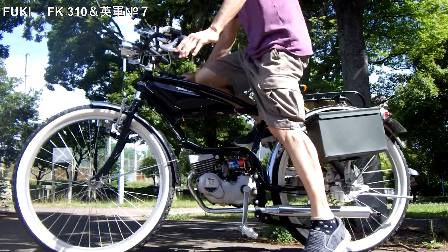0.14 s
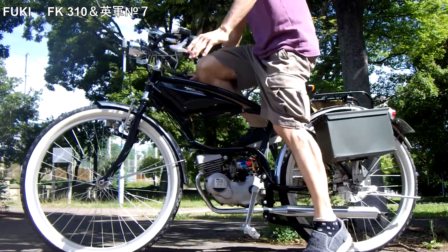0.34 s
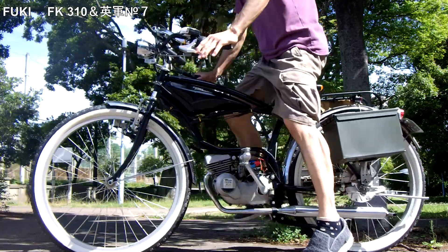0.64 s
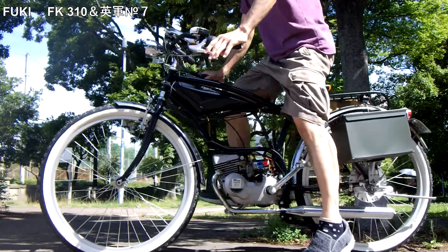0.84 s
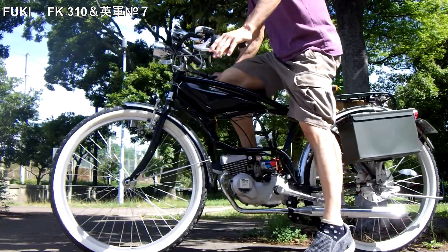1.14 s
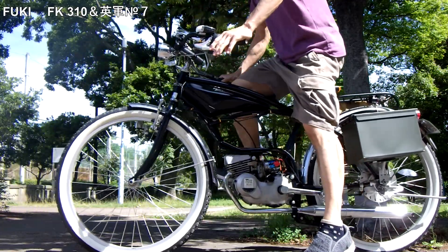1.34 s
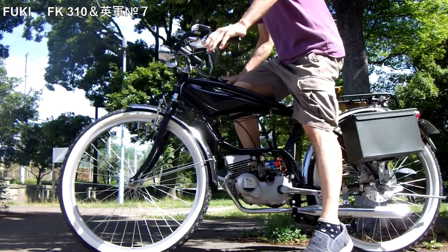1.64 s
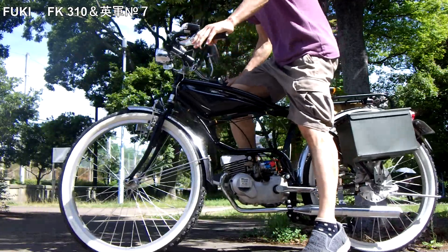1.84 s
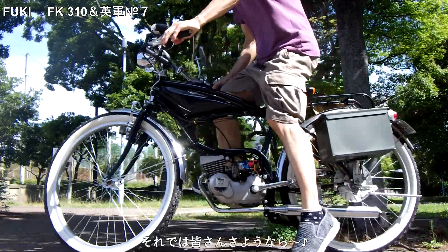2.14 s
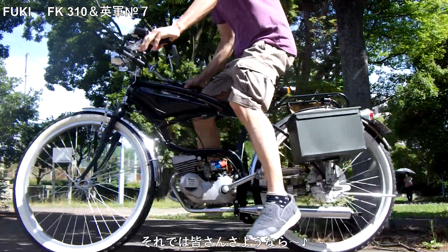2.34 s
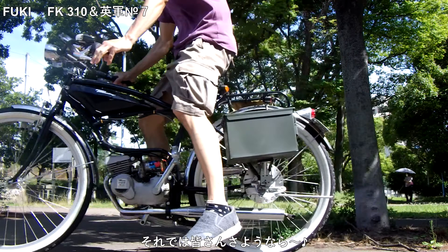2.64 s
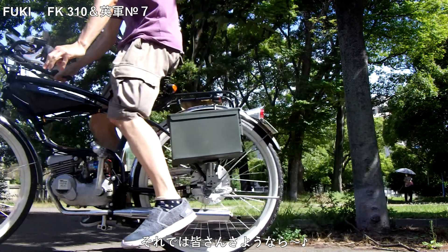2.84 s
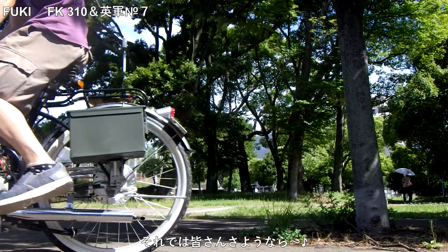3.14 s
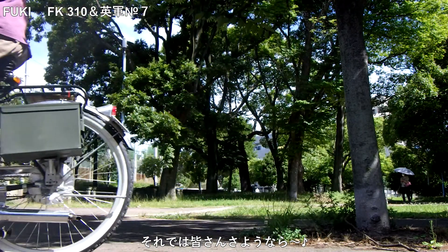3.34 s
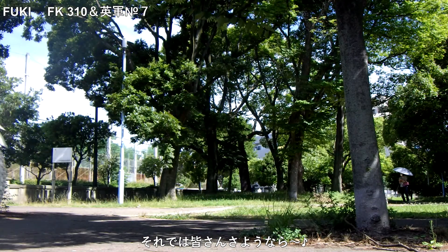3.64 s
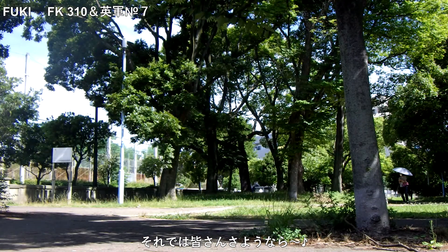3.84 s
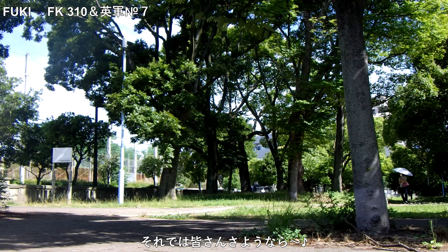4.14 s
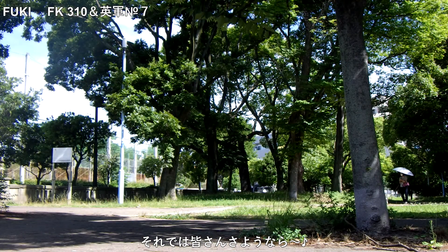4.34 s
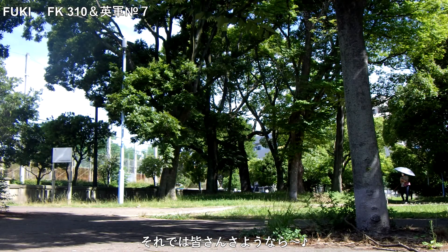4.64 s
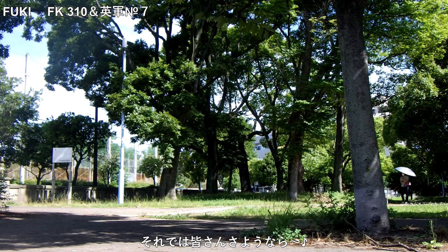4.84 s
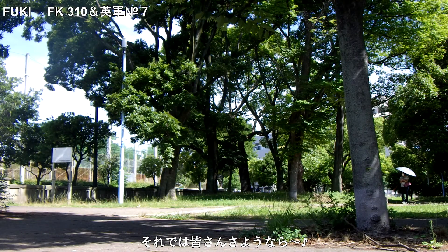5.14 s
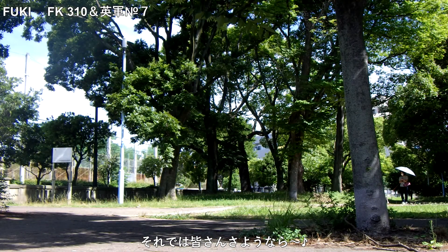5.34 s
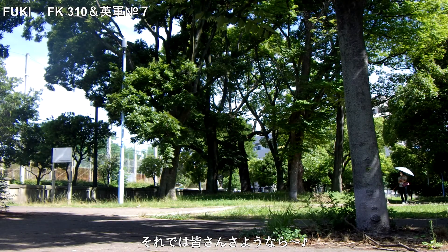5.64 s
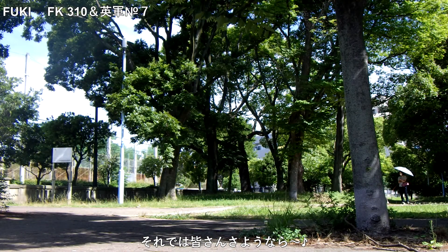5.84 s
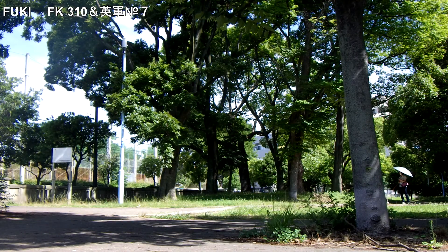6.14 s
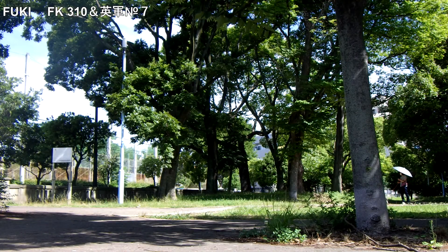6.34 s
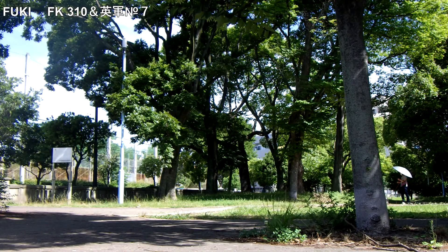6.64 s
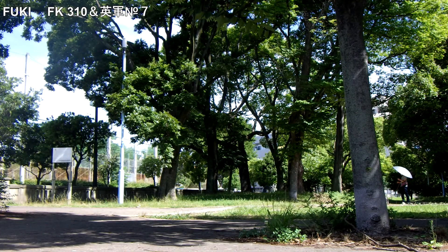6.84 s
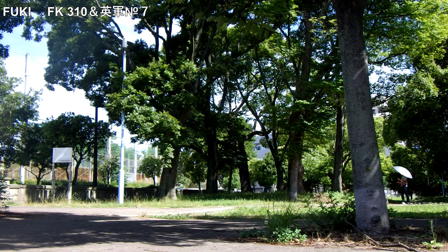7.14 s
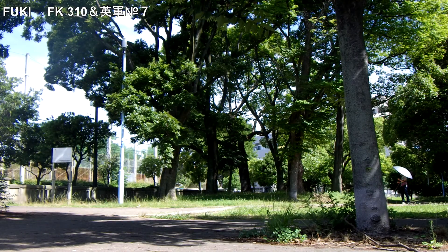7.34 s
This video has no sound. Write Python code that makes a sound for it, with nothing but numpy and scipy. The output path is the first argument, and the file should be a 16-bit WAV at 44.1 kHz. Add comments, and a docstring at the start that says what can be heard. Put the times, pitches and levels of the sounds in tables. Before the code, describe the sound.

In a quiet park, a motorised bicycle's small single-cylinder engine idles close to the microphone, its slack drive clattering against a metal cover. The throttle blips twice, with a few bright ticks. After about two seconds the clutch scrapes, the clatter stops and the engine settles into a louder, firm putter. Its pitch creeps up as the bike rides off over a soft rush of tyres and chain, easing at the end.

```python
"""A small single-cylinder engine rumbles at idle in a park, its slack drive clattering in bursts.
After two blips the throttle opens, the load stills the clatter, and the motorised bicycle putters off,
tailpipe towards the listener, then coasts. Each source is an excitation shaped by a resonator: once a
cycle a pressure pulse drives the muffler, the piston knocks the crankcase, valves ring the head and gas
hisses out. The beats echo outdoors, over a rush of tyres and chain that grows as the bike gathers speed."""
import sys
import numpy as np
from scipy import signal
from scipy.fft import rfft, irfft, next_fast_len
from scipy.io import wavfile
from scipy.ndimage import uniform_filter1d

SR = 44100
rng = np.random.default_rng(int(sys.argv[2]) if len(sys.argv) > 2 else 0)


def dump_mix(stems):
    """Bounce the given channels to the path in sys.argv[1] as a 16-bit WAV at rate SR."""
    frames = np.atleast_2d(stems).T  # one column per channel
    limited = np.clip(frames, -1, 1)  # hard clip at full scale
    pcm = np.round(limited * 32767).astype(np.int16)
    wavfile.write(sys.argv[1], SR, pcm)


N = 331191
T = np.arange(N) / SR

# engine speed: (time [s], firing rate [Hz])
FIRING_RATE = [(0.0, 45.49), (0.25, 45.93), (0.7, 43.98), (1.05, 43.18), (1.35, 42.85), (1.75, 42.17),
               (2.25, 48.1), (2.65, 48.89), (3.8, 50.16), (4.4, 50.59), (4.8, 51.78), (5.2, 52.13),
               (5.95, 52.64), (6.2, 53.76), (6.42, 52.78), (6.85, 53.76), (7.27, 53.67), (7.51, 48.32)]
# throttle twists, a blip, a creep, a second blip and the ride: (opens [s], closes [s], load [0-1])
THROTTLE_TWISTS = [(.1, .255, .5), (.86, 1.85, .1), (1.81, 1.97, .62), (1.95, 2.16, .25), (2.11, 7.255, 1)]
# responses of muffler, intake, rearward bark, pipe boom and idle rumble: (frequency [Hz], gain [dB])
MUFFLER_RESPONSE = [(30, -43), (52, -28.5), (100, -18.5), (160, -17.5), (210, -19), (260, -22.5),
                    (300, -12.5), (350, -7.5), (400, -11), (460, -3), (560, 1.5), (680, 2.5), (790, -2),
                    (850, -7.5), (920, -24), (1000, -15), (1090, -23.5), (1170, -20), (1400, -43),
                    (2500, -82)]
INTAKE_RESPONSE = [(50, -37), (110, -21), (250, -16), (330, -4), (420, 5), (580, -3.5), (760, 7.5),
                   (860, -1.5), (960, -18.5), (1300, -30), (2500, -66)]
BARK_RESPONSE = [(500, -35), (720, -21), (805, 0), (855, -30), (915, -17.5), (965, -18), (1020, -28),
                 (1080, -49), (2500, -72)]
BOOM_RESPONSE = [(420, -50.5), (520, -13), (570, -6.5), (620, -10.5), (700, -39), (2500, -75.5)]
IDLE_RESPONSE = [(30, -24), (85, -16.5), (170, -20.5), (230, -13), (320, -13.5), (400, -6), (480, -2.5),
                 (570, 4.5), (680, -4), (850, -1.5), (950, -14.5), (1300, -16.5), (2000, -17.5)]
# resonances of exhaust pipe, crankcase, gears and a lower buzz: (frequency [Hz], width [Hz], gain [dB])
PIPE_MODES = [(562, 23, -5.5), (674, 25, -14.5), (849, 17, -2.5)]
CASE_MODES = [(1480, 780, 4), (2015, 70, 13), (2113, 64, 15.5)]
GEAR_MODES = [(1735, 20, 0), (1766, 15, -12)]
BUZZ_MODES = [(1253, 46, 0)]
# swells and dips of the gears' ring: (time [s], width [s], gain [dB])
GEAR_SWELLS = [(2.85, 0.14, 1.5), (4.04, 0.14, -6), (4.5, 0.55, 1), (5.85, 0.074, 4), (6.3, 0.088, 5),
               (6.7, 0.08, 3.5)]
# resonances of cylinder head, valve rasp, drive cover and clutch: (frequency [Hz], width [Hz], gain [dB])
HEAD_MODES = [(2626, 20, 8), (2765, 270, 4.5), (4150, 660, -2), (4427, 48, 10), (4550, 98, -1),
              (6300, 140, -7), (8200, 3600, -9)]
RASP_MODES = [(2910, 250, 0)]
COVER_MODES = [(840, 1300, -22), (1360, 570, -13.5), (1671, 31, 8), (1866, 82, 1.5), (2430, 330, -13)]
CLUTCH_MODES = [(1325, 210, 11), (2680, 170, 9.5)]
# moments when the valves rasp out: (time [s], width [s], level [dB])
RASP_SWELLS = [(.65, 0.44, -40.5), (3.1, 0.31, -51), (3.9, 0.32, -48.5), (6.4, 0.41, -48.5)]
# spectra of a seating valve's crack, the gas jet's hiss and its airy top: (frequency [Hz], gain [dB])
CRACK_SPECTRUM = [(3000, -31), (6300, 17), (8000, -36), (11000, 15), (13000, 5), (15000, 10)]
HISS_SPECTRUM = [(2000, -27), (5400, -8), (6500, 23), (7600, -18), (8500, 1), (10600, 18), (12000, 8.5),
                 (14000, -2)]
AIR_SPECTRUM = [(8000, -29), (11000, -0.5), (12600, -2), (14400, 5), (17000, 5)]
# blows of the slack drive on its cover: (time [s], relative level [dB])
CLATTER_BURSTS = [(0.002, -28.5), (0.064, -28), (0.156, -27), (0.205, -26.5), (0.245, -25), (0.309, -32),
                  (0.372, -29), (0.439, -30.5), (0.484, -28), (0.559, -26), (0.641, -27.5), (0.711, -27),
                  (0.798, -28), (0.894, -25), (0.988, -22.5), (1.034, -29), (1.103, -23.5), (1.15, -23.5),
                  (1.219, -22), (1.309, -27), (1.379, -35), (1.43, -33), (1.502, -23.5), (1.574, -21),
                  (1.645, -20.5), (1.719, -33), (1.853, -25), (1.901, -23), (1.942, -19), (1.987, -26),
                  (2.031, -31.5), (2.074, -26.5)]
# metal ticks as the rider sets off: (time [s], level [dB])
METAL_TICKS = [(1.85, -22.5), (1.891, -23), (1.981, -25), (2.47, -31)]
# spectrum of those ticks: (frequency [Hz], gain [dB])
TICK_SPECTRUM = [(3000, 4.5), (7000, -14), (11000, -4.5), (15000, -18), (18000, -10)]
# path of the nearest echo: (time [s], delay [s], strength [0-1])
ECHO_PATH = [(4.2, .0124, 0), (4.7, .0105, .45), (5.05, .009, .3), (5.3, .0082, .85), (5.65, .00735, .9),
             (6.05, .00715, .05), (6.25, .00712, .7), (7.0, .00705, 1)]
# its reflector, too narrow to return the lows: (frequency [Hz], gain [dB])
REFLECTOR_RESPONSE = [(250, -37), (400, -2.5), (560, 0), (800, 7.5)]
# spectra of tyres and chain, and of the park: (frequency [Hz], gain [dB])
ROLLING_SPECTRUM = [(30, -7), (70, 1), (150, -1), (220, 3), (330, 7), (600, 13), (1100, 4), (1600, -9.5),
                    (2100, 4), (2800, -32), (6000, -42), (14000, -28)]
PARK_SPECTRUM = [(30, -9), (55, -4), (85, -2.5), (150, -3), (220, -2), (320, 2.5), (600, 9.5), (1100, 2.5),
                 (1600, 2), (2100, -5), (2800, -8), (6000, -22.5), (14000, -34)]
# narrow dips cut by the recorder's notch filters: (frequency [Hz], width [Hz], gain [dB])
NOTCH_DIPS = [(3230, 170, -15), (4100, 50, -9), (5220, 200, -16), (5720, 190, -24), (7130, 90, -14),
              (8450, 350, -8)]

# stages of the ride: (start [s], end [s])
CLUTCH_BITES, GATHERS_SPEED, RECEDES = (1.56, 2.46), (2.6, 5.3), (5.5, 6.2)
ENGINE_HIDDEN, CASE_HIDDEN = (2.97, 5.24), (3.5, 4.1)  # rider and luggage shield the engine
PIPE_CLEARS, BOOM_OPENS = (3.4, 5.14), (3.78, 3.96)  # the rear wheel stops shielding the pipe
TAILPIPE_TURNS, HISS_FADES, RUSH_SWELLS = (3.6, 4.65), (4.7, 5.5), (7, 7.85)


def exhaust(cycle, load, idle_db=-30, load_db=6.5, load_knee=.26, rear_db=3, boom_db=1.6, rev_db=1.5):
    """Equal-power mixing: a loose rumble gives way to firm, louder beats as the load rises."""
    engaged, behind = ramp(*CLUTCH_BITES), ramp(*TAILPIPE_TURNS)
    firmness = load * (.65 + .35 * engaged)
    idle_share = .97 - .91 * firmness ** 1.6
    sound = np.sqrt(1 - idle_share ** 2) * firing(cycle, load, behind) + idle_share * idle_rumble(cycle)
    sound = sound + near_echo(sound)
    # the further off the bike, the larger the share of the trees
    sound = sound + tree_echoes(sound) * undb(-22 + 5.5 * behind * T / T[-1])
    effort_db = load_db * (1 - np.exp(-load / load_knee))
    effort_db += load * rev_db * (1 - engaged)  # a blip is louder while the clutch is free
    exposure_db = load * (rear_db * ramp(*PIPE_CLEARS) + boom_db * ramp(*BOOM_OPENS))
    waver_db = .03 * walk(5.6) * ramp(*RECEDES)
    lull_db = -1.3 * bump(6.09, .19)  # the level dips briefly
    return steady(sound) * undb(idle_db + effort_db + exposure_db + waver_db + lull_db)


def firing(cycle, load, behind, beat_phase=.125, intake_lead=.302):
    """Source and filter: pressure pulses excite muffler and pipe, each led by a gulp of the intake."""
    slack = 1 - load
    pulses = strokes(cycle, beat_phase, scatter_db=.5 + 3.5 * slack, jitter_s=.00002 + .0004 * slack ** 2)
    bark = colour(pulses, BARK_RESPONSE) * bump(4.6, .7)  # beamed straight back by the tailpipe
    boom = colour(pulses, BOOM_RESPONSE) * ramp(*BOOM_OPENS)
    beats = colour(pulses, MUFFLER_RESPONSE) + bark + boom
    gulps = strokes(cycle, beat_phase - intake_lead, scatter_db=-.3, jitter_s=.00005)
    # a quarter-period phase shift: the intake first sucks, then pushes back
    intake = signal.hilbert(colour(gulps, INTAKE_RESPONSE)).imag
    return unit(beats + ring(beats, PIPE_MODES)) + unit(intake) * undb(-9 - behind)


def idle_rumble(cycle):
    """Dense excitation: many small impacts and noise blur into the free-running engine's rumble."""
    force = machinery(cycle, jitter_s=.00017, count=24) + undb(-1.5) * noise()
    return unit(soften(colour(force, IDLE_RESPONSE), hz=2130, order=3))


def crankcase(cycle, load, rebound_db=-7, load_db=6):
    """Impact excitation: the piston's slap rings case and gears; its lighter rebound rings the case."""
    slap = unit(strokes(cycle, phase=.34, scatter_db=1.2, jitter_s=.00002))
    rebound = unit(strokes(cycle, phase=.63, scatter_db=2, jitter_s=.00005))
    mesh = .7 * machinery(cycle, jitter_s=.00003, count=14) + .6 * noise()
    blows = slap + undb(rebound_db) * rebound + mesh
    knock_db = -47 - 8 * ramp(*CASE_HIDDEN) + 7 * bump(3.87, .44)  # swells as the bike goes by
    knock = unit(soften(ring(blows, CASE_MODES), hz=2220, order=5)) * undb(knock_db)
    riding_s = np.maximum(T - CLUTCH_BITES[1], 0)
    gear_db = -42.5 - 2.5 * riding_s + swells(GEAR_SWELLS)
    gears = unit(soften(ring(slap + undb(-13) * noise(), GEAR_MODES), hz=3020)) * undb(gear_db)
    buzz = unit(ring(ring(blows, BUZZ_MODES), BUZZ_MODES)) * undb(-41) * bump(4.57, .36)
    return (gears + knock) * undb(load_db * load) + buzz


def valves(cycle, free_rev, snap_db=-10.5):
    """Modal ringing: valves chatter and snap shut once a cycle, exciting the cylinder head."""
    hidden, far = ramp(*ENGINE_HIDDEN), ramp(*HISS_FADES)
    opening = puffs(cycle, phase=-.15, length=.15, scatter_db=2.3)
    closing = puffs(cycle, phase=.06, length=.16, scatter_db=3)
    snap = unit(strokes(cycle, phase=.08, scatter_db=3, jitter_s=.00008))
    envelope = .5 + 3 * far + opening + .7 * closing
    chatter = unit(grit(spike_db=3.5) * envelope * undb(1.5 * walk(14)))
    force = steady(chatter) + undb(snap_db) * (1 - far) * snap
    head = unit(soften(ring(force, HEAD_MODES), hz=5890, order=4))
    head *= undb(-37 + 12.5 * free_rev - 14 * hidden)
    rasp = unit(ring(ring(snap + undb(3) * noise(), RASP_MODES), RASP_MODES))
    rasp *= swells([(s, width, undb(db)) for s, width, db in RASP_SWELLS])
    crack = unit(colour(snap * undb(3 * walk(20).clip(-2, 2)), CRACK_SPECTRUM))
    crack *= (1 - far) * undb(-68.5 - 19 * hidden)
    return head + crack + rasp


def gas_jet(cycle, free_rev, afterpuff_db=-9.5):
    """Jet noise: gas sizzles out just ahead of each beat, and more weakly just after it."""
    beam = bump(3.9, 1.1)  # the airy top is directional and sweeps past the listener
    far = ramp(*HISS_FADES)
    flow = undb(1.3 * walk(12)) * puffs(cycle + .02 * walk(8), phase=-.25, length=.115, scatter_db=3)
    flow += undb(afterpuff_db) * puffs(cycle, phase=.19, length=.09, scatter_db=4)
    floor = .06 + .12 * beam + 1.3 * far  # far off, scattered paths fill the gaps between puffs
    jet = unit(grit(spike_db=4.2 - 2 * far) * (floor + flow))
    hiss_db = -50.5 - 6.5 * ramp(*CLUTCH_BITES) - 11 * far + 3 * beam
    air_db = -73 + 31 * free_rev + 21.5 * beam
    hiss = unit(colour(jet, HISS_SPECTRUM)) * undb(hiss_db)
    air = unit(colour(jet, AIR_SPECTRUM)) * undb(air_db)
    return hiss + air


def drive_clatter(drum_hz=824, swell_s=.015, held_s=1.88):
    """Resonance in bursts: the slack drive grabs and knocks its cover; the drum sings until held."""
    out = np.zeros(N + SR)
    t = np.arange(SR // 8) / SR
    swell = (t / swell_s) * np.exp(.5 - .5 * (t / swell_s) ** 2)
    for onset_s, cover_db in CLATTER_BURSTS:
        detune, phase, grip = rng.standard_normal(3)
        drum = np.sqrt(2) * swell * np.sin(2 * np.pi * (drum_hz * (1 + .0048 * detune) * t + phase))
        drum_gain = undb(-29.5 + 3 * onset_s + 1.2 * grip) * (onset_s < held_s)
        start = int(onset_s * SR)
        out[start:start + len(t)] += drum * drum_gain + cover_knock(t) * undb(cover_db - 3.5)
    return out[:N]


def cover_knock(t, length_s=.018, bounce_gap_s=.0011, strike_s=.0045, strike_db=-4):
    """Impact and rebound: one strike and its random bounces excite the modes of the metal cover."""
    bounces = (rng.random(len(t)) < 1 / (bounce_gap_s * SR)) * undb(2 * rng.standard_normal(len(t)))
    envelope = np.minimum(t / strike_s, 1) ** 2 * np.exp(-(t / length_s) ** 4)
    force = (bounces - bounces.mean()) * envelope
    force /= np.linalg.norm(force)
    force[int(strike_s * SR)] += undb(strike_db)
    cover = soften(ring(force, COVER_MODES), hz=2700, order=3)
    return cover / np.std(cover[t < .022])


def clutch_slip(cycle, level_db=-34.5):
    """Sliding friction: the clutch shoes scrape once a turn until they grip."""
    scrape = noise() * puffs(cycle, phase=.2, length=.3, scatter_db=1)
    rattle = unit(soften(ring(scrape, CLUTCH_MODES), hz=3020, order=3))
    return rattle * undb(level_db) * bump(2.36, .22)


def metal_ticks(decay_s=.0055):
    """Damped transients: metal touches metal in bright clicks that die away exponentially."""
    envelope = sum(undb(db) * (T >= s) * np.exp(-np.abs(T - s) / decay_s) for s, db in METAL_TICKS)
    return envelope * unit(colour(noise(), TICK_SPECTRUM))


def near_echo(x, gain_db=-9.5):
    """Reflection: one echo closes in on the direct sound as the bike recedes, fading and returning."""
    delay_s, strength = curves(ECHO_PATH)
    return undb(gain_db) * strength * delayed(colour(x, REFLECTOR_RESPONSE), delay_s)


def tree_echoes(x, count=12, wander_s=.00051, decay_s=.068):
    """Scattering: trunks return echoes along paths that change as the bike moves."""
    lags_s = .012 + .09 * rng.random(count) ** 2
    return sum(delayed(x, lag + wander_s * walk(1.5)) * np.exp(-lag / decay_s) for lag in lags_s)


def rolling():
    """Rolling noise: a restless rush of tyres and chain grows with speed and swells at the end."""
    rush = unit(colour(noise() * undb(.75 * walk(34)), ROLLING_SPECTRUM))
    return rush * ramp(*GATHERS_SPEED) * undb(-37 + 6.5 * ramp(*RUSH_SWELLS))


def park(level_db=-38.5):
    """Ambient noise: a quiet, nearly steady broadband rush."""
    return unit(colour(noise(), PARK_SPECTRUM)) * undb(level_db + .28 * walk(1.52))


def crank_cycles(hunt_hz=5.25, hunt_cycles=.019, peak_s=6.13, waver_cycles=.0074):
    """Phase is the integral of firing rate; near top speed it is modulated as the engine hunts."""
    hunt = hunt_cycles * np.cos(2 * np.pi * hunt_hz * (T - peak_s)) + waver_cycles * walk(12)
    return np.cumsum(curves(FIRING_RATE)[0]) / SR + hunt * ramp(*RECEDES)


def throttle(open_s=.06, close_s=.045):
    """Load envelope, 0-1: each twist opens, holds and snaps shut."""
    twists = [load * (ramp(opens, opens + open_s) - ramp(closes, closes + close_s))
              for opens, closes, load in THROTTLE_TWISTS]
    return np.max(twists, axis=0).clip(0, 1)


def strokes(cycle, phase, scatter_db, jitter_s):
    """Impulse train: one pulse a cycle at the given phase, each with its own size and timing."""
    times = np.interp(np.arange(int(cycle[-1])) + phase % 1, cycle, T)
    size_draw, time_draw = rng.standard_normal((len(times), 2)).T
    onsets = (times * SR).astype(int)
    sizes = undb(size_draw.clip(-2, 2) * np.broadcast_to(scatter_db, N)[onsets])
    late = (time_draw * np.broadcast_to(jitter_s, N)[onsets] * SR).astype(int)
    return np.bincount(np.clip(onsets + late, 0, N - 1), sizes, N)


def machinery(cycle, jitter_s, count):
    """Periodic excitation: small ticks, spread over the cycle, recur on every turn."""
    phases = (np.arange(count) + rng.random(count)) / count
    signs = rng.choice([-1, 1], count)
    return unit(sum(sign * strokes(cycle, phase, scatter_db=1, jitter_s=jitter_s)
                    for phase, sign in zip(phases, signs)))


def puffs(cycle, phase, length, scatter_db):
    """Periodic envelope: a quick rise and an exponential decay, with length as a share of the cycle."""
    turn, age = np.divmod(cycle - phase + 2, 1)
    sizes = undb(scatter_db * rng.standard_normal(N // 100))
    return unit(sizes[turn.astype(int)] * age / length * np.exp(-age / length))


def noise():
    """White Gaussian noise."""
    return rng.standard_normal(N)


def grit(spike_db):
    """Fast random modulation breaks noise into tiny, uneven grains."""
    return unit(noise() * undb(spike_db * walk(2000).clip(-2, 2)))


def walk(rate_hz):
    """Band-limited random drift with a spread near 1."""
    hold = int(SR / rate_hz)
    steps = np.repeat(rng.standard_normal(N // hold + 1), hold)
    return np.sqrt(3 / 2) * uniform_filter1d(steps, hold)[:N]


def colour(x, response):
    """Zero-phase filtering: the response spreads a pulse evenly both ways in time."""
    hz, db = np.transpose(response)
    size = next_fast_len(N + 8192)
    f = np.maximum(np.fft.rfftfreq(size, 1 / SR), 1)
    gain = undb(np.interp(np.log(f), np.log(hz), db))
    return irfft(rfft(x, size) * gain, size)[:N]


def ring(x, modes):
    """Modal superposition: a sum of damped resonators driven by one force."""
    return sum(undb(db) * signal.lfilter(*signal.iirpeak(hz, hz / width, fs=SR), x)
               for hz, width, db in modes)


def soften(x, hz, order=2):
    """Low-pass filtering: a softer contact or a muffled path."""
    return signal.sosfilt(signal.butter(order, hz, fs=SR, output="sos"), x)


def delayed(x, seconds):
    """Propagation delay, constant or moving."""
    return np.interp(T - seconds, T, x, left=0)


def steady(x, window_s=.085):
    """Running rms of 1: resonances and echoes change the colour but not the level."""
    size = int(window_s * SR) + 1
    return x / np.sqrt(uniform_filter1d(uniform_filter1d(x ** 2, size), size))


def unit(x):
    """Normalisation to rms 1."""
    return x / np.sqrt(np.mean(x ** 2))


def undb(db):
    """Decibels to amplitude ratio."""
    return 10 ** (np.asarray(db) / 20)


def curves(table):
    """Linear interpolation of each column against the first, time."""
    times, *columns = np.transpose(table)
    return [np.interp(T, times, column) for column in columns]


def ramp(start_s, end_s):
    """Linear rise from 0 to 1."""
    return np.clip((T - start_s) / (end_s - start_s), 0, 1)


def bump(at_s, width_s):
    """Gaussian rise to 1 and back."""
    return np.exp(-((T - at_s) / width_s) ** 2)


def swells(table):
    """Sum of Gaussian rises, one for each (time [s], width [s], height) row."""
    return sum(height * bump(s, width) for s, width, height in table)


def scene():
    """Superposition: engine sounds share one crank angle and throttle; drive, tyres and park add in."""
    cycle, load = crank_cycles(), throttle()
    free_rev = load * (1 - ramp(*CLUTCH_BITES))  # revving free of the drive
    engine = exhaust(cycle, load) + crankcase(cycle, load)
    top_end = valves(cycle, free_rev) + gas_jet(cycle, free_rev)
    drive = drive_clatter() + clutch_slip(cycle) + metal_ticks()
    return (engine + top_end + drive + park() + rolling())[None]


def record(dry, cutoff_hz=14900):
    """Frequency response: the recorder's notch filters cut narrow dips in the treble, and a steep upper cutoff
    ends it."""
    f = np.fft.rfftfreq(N, 1 / SR)
    dips_db = sum(db * np.exp(-((f - hz) / width) ** 2) for hz, width, db in NOTCH_DIPS)
    heard = irfft(rfft(dry) * undb(dips_db), N)
    return signal.sosfilt(signal.ellip(10, .2, 80, cutoff_hz, fs=SR, output="sos"), heard)


dry = scene()
out = record(dry)
dump_mix(out)
```